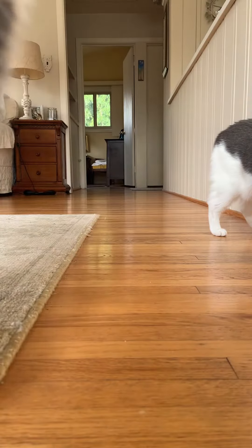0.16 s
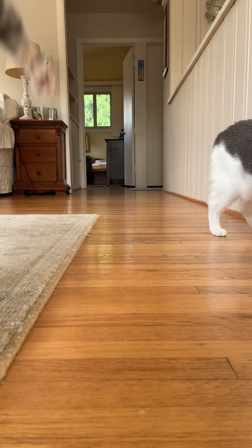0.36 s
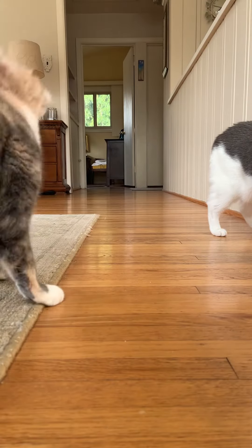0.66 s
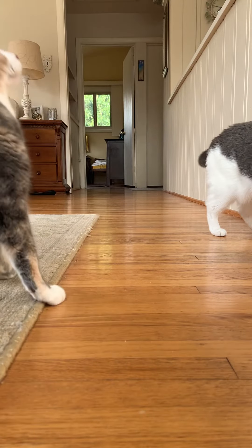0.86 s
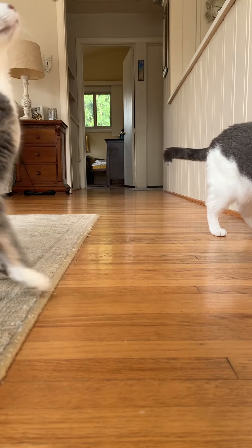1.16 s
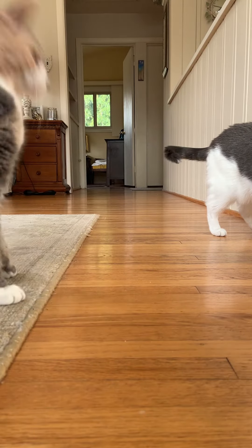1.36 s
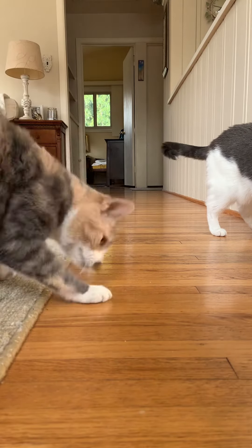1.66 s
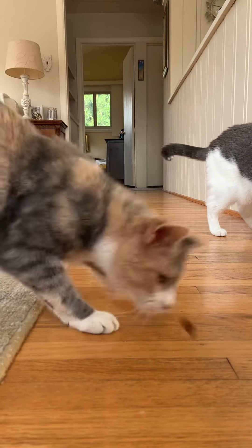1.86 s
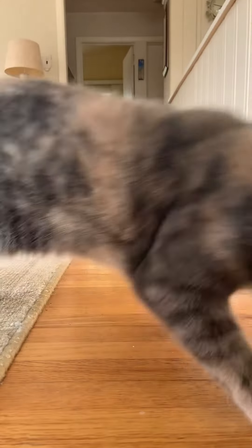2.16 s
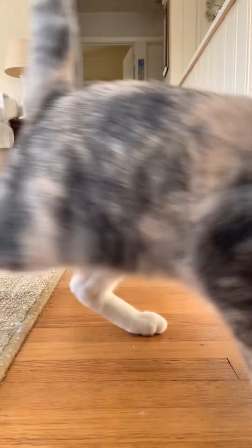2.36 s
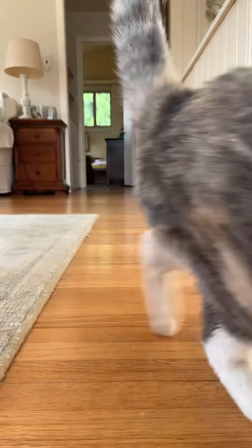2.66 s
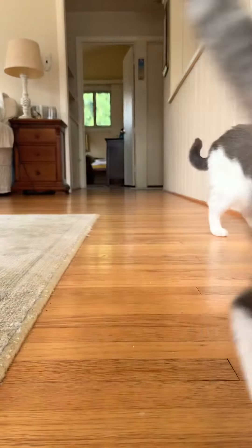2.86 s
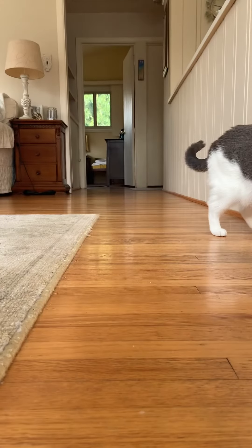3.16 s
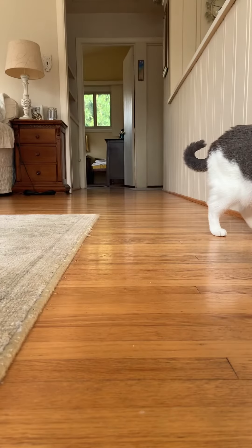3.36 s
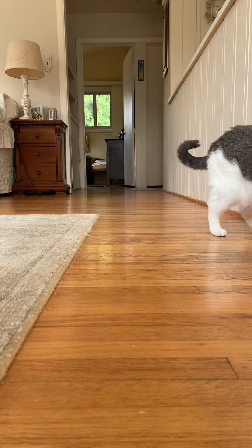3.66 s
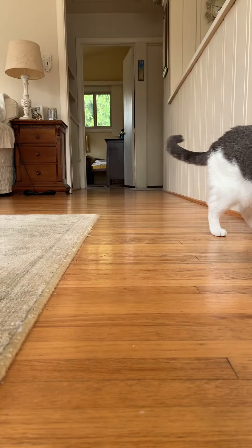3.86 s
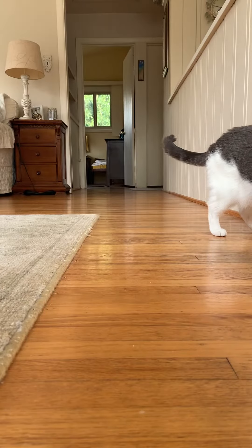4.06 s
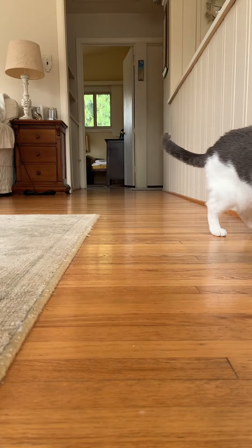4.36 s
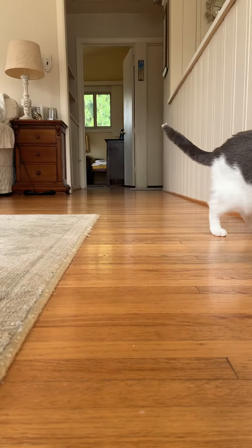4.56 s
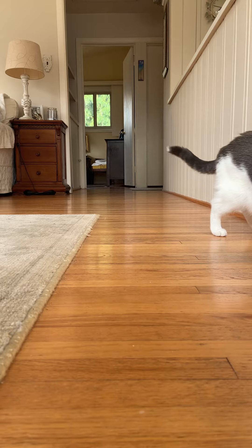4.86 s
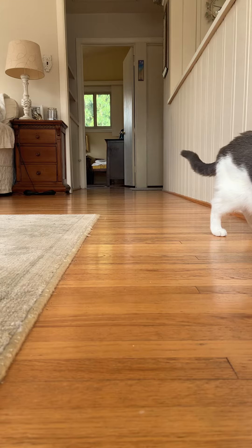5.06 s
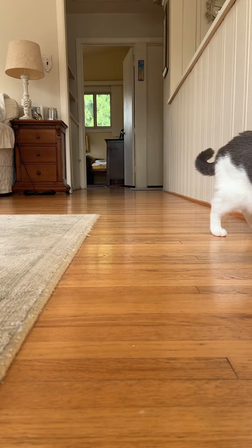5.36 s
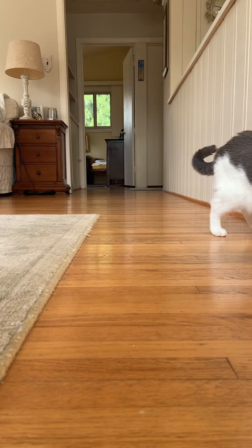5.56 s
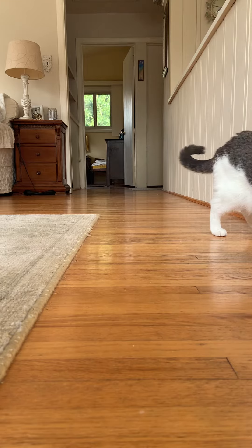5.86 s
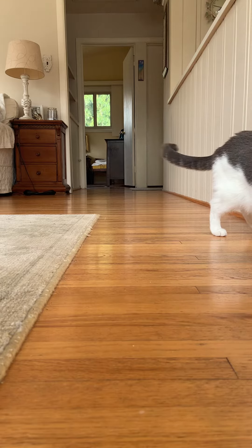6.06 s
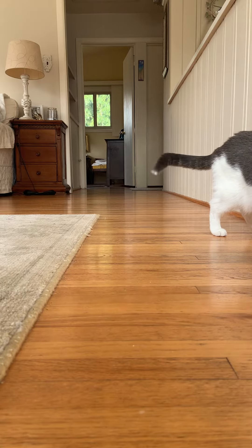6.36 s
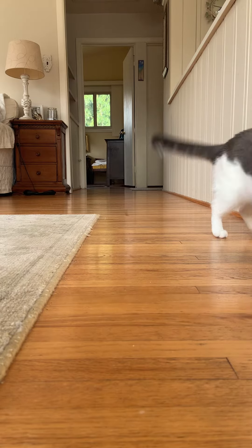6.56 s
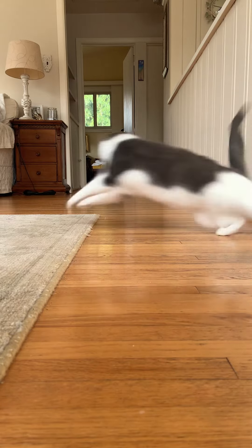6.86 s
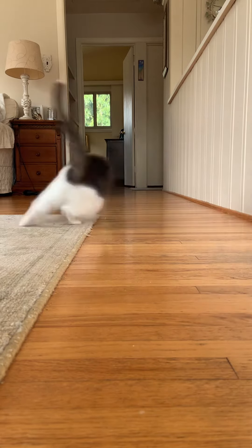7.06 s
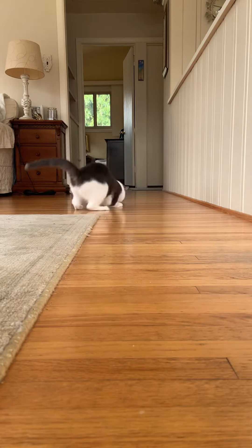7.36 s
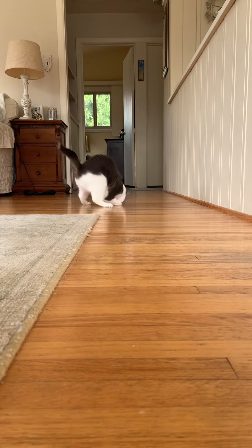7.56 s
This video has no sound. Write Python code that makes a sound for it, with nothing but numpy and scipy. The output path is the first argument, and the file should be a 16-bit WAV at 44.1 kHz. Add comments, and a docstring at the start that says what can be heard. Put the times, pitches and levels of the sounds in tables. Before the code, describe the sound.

Close stereo sound from floor level: near silence with faint hiss and low house rumble, then hard treat clicks on planks and a rapid patter of claws with knocky wood tone. Scraping fades, a sleeve rustles faintly, a loud click rings out with smaller bounces. Last, heavier paw thuds, scratchy claw slides and rumbling boards move down the hallway with short wall echoes.

```python
"""Dry treats tossed on a hardwood floor click in a quiet hallway while two cats chase them.
Each hard contact is two close cracks and a plank knock; each paw thump is a fading low swing of the board.
Scrabbling claws and rustling cloth are shaped noise, and a faint rumble and hiss lie underneath.
Wall echoes and a fading tail make the hallway; a phone lying on the floor hears it in stereo."""
import sys
import numpy as np
from scipy import signal
from scipy.fft import rfft, irfft, next_fast_len
from scipy.io import wavfile
from scipy.ndimage import map_coordinates

SR = 44100
rng = np.random.default_rng(int(sys.argv[2]) if len(sys.argv) > 2 else 0)


def wav_out(sig):
    """Save sig, one row per channel (or a flat mono array), as 16-bit PCM at SR to the path in sys.argv[1]."""
    wavfile.write(sys.argv[1], SR, np.round(np.clip(np.atleast_2d(sig).T, -1, 1) * 32767).astype(np.int16))


N = 340011  # length of the scene in samples


def amp(db):
    """Turn decibels into a plain multiplier."""
    return 10 ** (np.asarray(db) / 20)


def unit(x):
    """Scale a signal to an average strength (rms) of 1."""
    return x / np.sqrt(np.mean(x ** 2) + 1e-20)


def along(points, hz):
    """Read a (frequency, value) table at any frequency, on a logarithmic pitch axis."""
    f, value = np.transpose(points)
    return np.interp(np.log(hz + 1), np.log(f + 1), value)


def level_curve(rows):
    """Give a level in dB for every sample, practically silent outside the span of its table."""
    s, db = np.transpose(rows)
    return np.interp(np.arange(N) / SR, s, db, left=-200, right=-200)


def wobble(rate):
    """Draw a smooth random curve through `rate` random points a second."""
    knots = rng.standard_normal(int(N * rate / SR) + 4)
    return map_coordinates(knots, [np.arange(N) * rate / SR])


def filtered(x, response):
    """Multiply the spectrum of x by a (possibly complex) response of frequency."""
    n = x.shape[-1]
    padded = next_fast_len(n + 8192)
    hz = np.fft.rfftfreq(padded, 1 / SR)
    return irfft(rfft(x, padded) * response(hz), padded)[..., :n]


def resonant(x, modes):
    """Let x ring in several resonances (frequency, width, dB), every second one upside down."""
    def response(f):
        total = 0
        for k, (center, width, db) in enumerate(modes):
            peak = 1j * f * width / (center * center - f * f + 1j * f * width)
            total = total + (-1) ** k * amp(db) * peak
        return total
    return filtered(x, response)


# How alike left and right are in sound from all around: (frequency [Hz], likeness [0 to 1])
LEFT_RIGHT_LIKENESS = [(100, 1), (300, 0.72), (700, 0.15), (2500, 0.059), (4000, 0.76), (7000, 1)]


def spread(pair):
    """Mix two unrelated signals into left and right: a shared part plus a part of opposite sign."""
    def shares(hz):
        turn = np.arccos(np.clip(along(LEFT_RIGHT_LIKENESS, hz), 0, 1)) / 2
        return np.array([np.cos(turn), np.sin(turn)])
    mid, side = filtered(pair, shares)
    return np.array([mid + side, mid - side])


def noise(spectrum, grain_db=0, grain_rate=300):
    """Make wide coloured noise of rms 1, its strength broken into grains."""
    pair = amp(grain_db * wobble(grain_rate)) * rng.standard_normal((2, N))
    colored = filtered(pair, lambda hz: amp(along(spectrum, hz)))
    return unit(spread(colored))


# Hard contacts on the floor: treats, claws and a few dull paw taps: (time [s],
# crack level around 2 kHz [dB], treble tilt before its share [dB],
# knock drive over the crack level [dB], gap to the second crack [ms])
CONTACTS = [(0.3092, -37.5, -71, 26, 1.3), (0.4953, -26.5, -50, 34, 2.05), (0.9223, -36.5, -69, 34.5, 0.84),
            (1.369, 3, 0, 13, 1.09), (1.4426, 0.5, -4.5, 8.5, 0.59), (1.6646, -9.5, -8, 20, 0.61),
            (1.676, -8.5, -1.5, 22, 1.3), (1.7994, -6, -92, 16, 2.4), (1.8371, -4.5, -25.5, 15, 1.12),
            (1.9061, -6, -28, 10, 0.92), (1.9585, -5.5, -9, 4, 2.13), (1.996, -6, -8, 11, 1.47),
            (2.0347, -15, -11, -19, 2.7), (2.0536, -13.5, -11, 11.5, .69), (2.0776, -20, -7, -19, 0.63),
            (2.0972, -14, -22, -22, 1.1), (2.2202, -19.5, -22, 1, 1.76), (2.2405, -25.5, -25, -10.5, 1.1),
            (2.258, -28.5, -14, -11, 0.94), (2.4227, -22, -31, 11, 0.95), (2.9478, -31.5, -26, 11, 1.6),
            (3.0065, -14.5, -47, -32, 0.52), (3.151, -20, -17, -19, 0.61), (3.2114, -32.5, -10, 2.5, 2.2),
            (3.9915, -48, 3, 7.5, .68), (4.201, 5, -0.5, -3.5, 1.59), (4.4294, -2.5, -17, 1.5, 0.86),
            (4.5305, -14.5, -19, 4, 1.52), (4.5734, -16.5, -60, -10, 1.66), (4.619, -12, -25, -3, 0.51),
            (4.64, -11.5, -22, -12, 1.73), (4.6683, -9, -42, 4, 0.87), (4.823, -15, -33, 3.5, 1.01),
            (4.8549, -16, -11.5, 1.5, 0.8), (5.1007, -14, -71, -0.5, 1.14),
            (5.4037, -20.5, -45.5, -22, .51), (5.6271, -27.5, -55.5, -6, 2.06), (6.4301, -6, 4, 24.5, 2.25),
            (6.708, -15, 5, 17.5, 0.91), (6.8154, -19, -15, 21.5, 1.2), (6.904, -18.5, 3.5, 25, .99),
            (6.993, -9, -66, 14.5, 2.06), (7.056, -22, 8, 15, 0.78), (7.07, -23.5, -6, 0, .58),
            (7.147, -13, -2.5, 16, 1.1), (7.265, -19, 10, 27, 0.5), (7.278, -5, -12, 11.5, 1.33),
            (7.313, -4.5, -6.5, 6, 1), (7.396, -5.5, -6.5, 11.5, 1.3), (7.4274, -11, -42, 4, 0.66),
            (7.523, -13.5, -23, -14, 0.43), (7.5422, -18.5, -10.5, 17, 1.45), (7.5915, -20, -7, 24, 0.8)]
# Colour of a hard contact: (frequency [Hz], level [dB])
CRACK_COLOR = [(100, -32.5), (400, -9), (1100, -2), (2000, 0.5), (2800, -2.5), (3600, 3.5), (4700, -0.5),
               (6200, 3), (10000, 1), (16000, -11.5)]
# How much of the treble tilt acts: (frequency [Hz], share)
TREBLE_SHARE_BY_HZ = [(1100, -0.075), (2000, -0.024), (3400, 0.21), (5600, 0.27), (10000, 1.275),
                      (16000, 1.7)]
# Resonances of the plank: (frequency [Hz], width [Hz], level [dB])
PLANK_MODES = [(397, 70, -3), (843, 120, -0.5), (1270, 56, -1.5)]
# Dry near the phone, roomy further off: (time [s], room feed over direct feed [dB])
ROOM_FEED = [(0, -13.5), (1.37, -13.5), (2.0, -16.5), (2.45, -3), (3.0, -19.5), (4.2, -11), (4.85, -8),
             (5.6, -15.5), (6.43, -5.5), (6.9, 1), (7.4, -8), (7.7, 0)]


def clicks():
    """Each hard contact is two close cracks and a plank knock; returns direct sound and room feed."""
    lead = 100  # samples before the contact
    t = np.arange(-lead, 500) / SR
    blow = np.pad([1.], (lead + 40, 4000))
    # narrow the push around 417 Hz, so the knock has little deep sound
    pushed = resonant(blow, [(417, 120, 0.0033)])
    knock = resonant(pushed, PLANK_MODES)
    dry, wet = np.zeros((2, N + SR))
    for s, db, treble_db, knock_db, gap_ms in CONTACTS:
        room_db = np.interp(s, *np.transpose(ROOM_FEED))
        hits = np.zeros(len(t))
        hits[[lead, lead + round(gap_ms * SR / 1000)]] = 1, .7
        # a quickly dying burst of noise after each hit
        splinters = 0.18 * amp(-60 * np.abs(t) / 0.0055) * (t > 0) * rng.standard_normal(len(t))
        crack = signal.fftconvolve(hits, splinters + (t == 0))[lead:][:len(t)]
        crack = crack / np.linalg.norm(crack)
        room_crack = hits + 0.41 * (t == 0)
        crack, room_crack = filtered(
            np.array([crack, room_crack]),
            lambda hz: amp(db + along(CRACK_COLOR, hz) + treble_db * along(TREBLE_SHARE_BY_HZ, hz)))
        at = round(s * SR) - lead
        dry[at:][:len(t)] += crack
        dry[at:][:len(knock)] += amp(db + knock_db) * knock
        wet[at:][:len(t)] += amp(room_db) * room_crack
        wet[at:][:len(knock)] += amp(db + knock_db + room_db) * knock
    return dry[:N], wet[:N]


# Paw falls: (time [s], strength [dB], pitch [Hz])
PAW_FALLS = [(0.312, -38.5, 143), (0.342, -41.5, 120), (0.513, -26, 55.6), (1.671, -31, 329),
             (1.701, -34, 67.5), (2.206, -33, 70), (2.473, -41, 92.4), (2.757, -37.5, 254),
             (6.653, -30, 233), (6.683, -20.5, 221), (6.714, -22.5, 192), (6.762, -31, 254),
             (6.809, -34, 230), (6.961, -9.5, 124), (6.996, -18, 194.5), (7.023, -19, 125),
             (7.059, -36, 200), (7.156, -31.5, 114), (7.24, -19, 227), (7.278, -24.5, 121.5),
             (7.449, -33, 142.4), (7.583, -32, 133.6)]


def paws():
    """A soft pad pushes the board down; it swings a few times and dies away."""
    out = np.zeros(N + SR)
    t = np.arange(SR // 3) / SR
    for s, db, hz in PAW_FALLS:
        swing = np.sin(2 * np.pi * hz * t)
        swing += 0.51 * np.sin(2 * np.pi * 1.9 * hz * t) * amp(-60 * t / 0.07)
        swing += .5 * np.sin(2 * np.pi * 300 * t) * amp(-60 * t / .06)  # a fixed mode of the board
        soft_start = (1 - np.exp(-t / 0.0019)) ** 2
        fade = amp(db - 60 * t / 0.048)  # the whole swing loses 60 dB in 0.048 s
        out[round(s * SR):][:len(t)] -= fade * soft_start * swing
    return out[:N]


# Claws, pads and fur sliding on the wood: (time [s], length before the fast fade [s],
# level before the slide's shape is counted [dB], varnish ring over the body [dB])
SLIDES = [(0.501, 0.056, -67.5, -35), (.93, .06, -74.5, -40), (2.105, 0.16, -62.5, -38),
          (2.226, 0.014, -64, 5), (2.254, 0.17, -64.5, -24), (2.373, 0.28, -56, -34),
          (2.514, 0.039, -41.5, -6.5), (2.547, 0.039, -49.5, -41), (2.628, 0.1, -57, -45),
          (2.722, 0.051, -51, -52), (2.772, 0.049, -51, -47), (2.839, 0.074, -53.5, -54),
          (2.902, 0.081, -60.5, -39), (2.997, .016, -48, -39), (3.035, 0.2, -68, -11),
          (4.444, 0.064, -57, -24), (4.532, 0.042, -74, -34), (4.691, 0.15, -75, -40),
          (4.859, 0.064, -52.5, -18), (5.02, 0.076, -54, -38.5), (5.228, 0.068, -64.5, -40.5),
          (5.333, 0.094, -64.5, -26), (5.452, .16, -66, -36), (5.753, 0.046, -79.5, -29.5),
          (6.731, .07, -51.5, -5), (6.8, 0.028, -45.5, 0), (6.918, 0.14, -49.5, -6.5),
          (7.076, 0.11, -59.5, 2), (7.165, 0.15, -50, 4.5), (7.239, 0.11, -40, -5), (7.398, 0.076, -55, 2),
          (7.499, 0.1, -47.5, -7.5)]
SLIDE_HZ = 1688  # middle of the slides' resonances
SLIDE_SCATTER, CHANCE_SCATTER = .1, .45  # log spread from slide to slide, and of the chance resonances
TICKS_PER_S, TICK_DB, TICK_SCATTER_DB = 300, 20, 4  # single catches: average rate, drive and its spread
SWELL_SHARE = 0.15  # time constant of pressing down, as a share of the length


def strokes():
    """Gritty slips and single catches ring in the slide's own, chance, board and varnish resonances."""
    out = np.zeros((2, N + SR))
    grit = np.pad(amp(4.5 * wobble(160) + 4 * wobble(45)), (0, SR))
    for s, length, db, varnish_db in SLIDES:
        hz = SLIDE_HZ * np.exp(SLIDE_SCATTER * rng.standard_normal())
        t = np.arange(round((length + 0.061) * SR)) / SR
        at = slice(round(s * SR), round(s * SR) + len(t))
        swell = 1 - np.exp(-t / (SWELL_SHARE * length))
        fade = amp(-4 * t / length - 60 * np.maximum(t - length, 0) / 0.021)
        shape = swell * fade
        caught = rng.random(len(t)) < TICKS_PER_S / SR
        ticks = caught * amp(TICK_DB + TICK_SCATTER_DB * rng.standard_normal(len(t)))
        hiss = grit[at] * rng.standard_normal((2, len(t)))
        slips = (hiss + ticks * [[1], [0]]) * shape  # catches go only to the shared part of left and right
        chance = [(hz * np.exp(CHANCE_SCATTER * step), 350, -3) for step in rng.standard_normal(3)]
        body = resonant(resonant(slips, [(hz, 2800, 0)]), [(hz, 900, 0), *chance])
        body = body + resonant(slips, [(747, 110, -14.5), (1130, 300, -9)])  # the board under the paw
        varnish = resonant(resonant(slips, [(4990, 2500, 0)]), [(5200, 1600, 0)])
        strength = amp(db) * np.sqrt(np.mean(shape ** 2))
        out[:, at] += strength * (unit(body) + amp(varnish_db) * unit(varnish))
    return spread(out[:, :N])


# Cloth moving, one list for each stretch: (time [s], level [dB])
CLOTH_MOVES = [
    [(3.36, -80.5), (3.48, -69), (3.62, -62), (3.86, -66.5), (3.97, -90)],
    [(4.05, -81.5), (4.125, -64.5), (4.2, -69)],
    [(5.9, -90), (6.042, -81), (6.15, -74.5), (6.33, -79), (6.41, -83)],
]
# Colour of the cloth noise: (frequency [Hz], relative level [dB])
CLOTH_COLOR = [(300, -2), (700, -4), (1600, -1), (3000, -8), (6000, -18), (16000, -23)]


def cloth():
    """A sleeve brushes before a throw: grainy noise that swells and fades."""
    strength = sum(amp(level_curve(rows)) for rows in CLOTH_MOVES)
    return strength * noise(CLOTH_COLOR, 1.0, 42)


# Wall echoes: (delay [s], level [dB])
WALL_ECHOES = [(0.0168, -17), (.029, -9), (.035, -7.5), (0.051, -14.5)]
# How fast the main tail dies: (frequency [Hz], time to lose 60 dB [s])
HALL_FADE = [(150, 0.38), (400, 0.33), (1040, 0.49), (2760, 0.42), (7280, 0.23), (14000, 0.22)]
# The treble of the tail fills in later than the bass: (frequency [Hz], rise time constant [s])
TAIL_RISE = [(1500, 0.0025), (5000, 0.017)]
LATE_DB, LATE_T60_S = -21.5, 0.75  # the further rooms ring on: level beside the main tail, time to lose 60 dB


def hall(x):
    """Rough wall echoes and a dying tail; sources move, so each eighth of a second gets its own."""
    out = np.zeros((2, N + 2 * SR))
    step = SR // 8
    for start in range(0, N, step):
        hz, t, grains = signal.stft(rng.standard_normal((2, SR // 2)), SR, nperseg=256)
        rise = 1 - np.exp(-(t / along(TAIL_RISE, hz)[:, None]) ** 2)
        fade = amp(-60 * t / along(HALL_FADE, hz)[:, None])
        late = amp(LATE_DB - 60 * t / LATE_T60_S)
        tail = signal.istft(grains * rise * (fade + late), SR, nperseg=256)[1]
        tail = spread(tail) / np.linalg.norm(tail[0])
        for s, db in WALL_ECHOES:
            rough = np.diff(rng.standard_normal(41) * np.hanning(41))  # panelling scatters the treble
            tail[:, round(s * SR):][:, :len(rough)] += amp(db) * rough / np.linalg.norm(rough)
        answer = signal.fftconvolve(x[None, start:start + step], tail, axes=1)
        out[:, start:start + answer.shape[1]] += answer
    return out[:, :N]


# House rumble and shaking boards: (time [s], level before a random sway [dB])
RUMBLE_LEVEL = [(0.0, -64.5), (0.43, -66), (1.09, -67), (2.4, -60), (3.18, -67.5), (4.53, -63),
                (6.05, -69.5), (6.66, -61.5), (6.83, -51.5), (7.09, -41), (7.71, -53.5)]
# Colour of the rumble: (frequency [Hz], relative level [dB])
RUMBLE_COLOR = [(20, -42.5), (40, -2.5), (60, 1.5), (80, -4), (125, -2.5), (200, -9.5), (300, -15.5),
                (500, -28), (900, -60)]
# Colour of the hiss: (frequency [Hz], relative level [dB])
HISS_COLOR = [(200, -8), (600, -1), (1500, 2), (3000, -2), (5000, -4), (9000, -6), (15000, -6.5),
              (15600, -31)]


def background():
    """Low, swaying noise for the rumble of the house, with a faint steady hiss."""
    sway_db = 1.5 * wobble(9)
    rumble = amp(level_curve(RUMBLE_LEVEL) + sway_db) * noise(RUMBLE_COLOR)
    return rumble + amp(-78.0) * noise(HISS_COLOR)


def scene():
    """Add the direct sounds, their answer from the hallway, the cloth and the background."""
    dry, wet = clicks()
    thumps = paws()
    slides = strokes()
    room = hall(wet + amp(-3.5) * thumps + amp(-12.5) * slides[0])
    return dry + thumps + slides + room + cloth() + background()


# Phase by which left leads right: (frequency [Hz], lead [radians])
LEFT_LEAD = [(0, 0), (300, -.3), (550, -.8), (1100, -1.5), (1800, -.3), (3600, 1.3), (4600, 3.14),
             (16000, 19.4)]
# Bass balance: (frequency [Hz], left minus right [dB])
BASS_LEAN = [(30, 3), (150, 1.5), (300, 2), (600, 0)]
# Response shared by both microphones: (frequency [Hz], level [dB])
MIC_RESPONSE = [(20, -26), (45, 2), (12000, -3), (15500, -5), (16600, -13.5)]
TOP_HZ = 16650  # nothing is kept from here up


def record(dry):
    """The two microphones differ in phase and bass level and share one limited frequency range."""
    def response(hz):
        phase = np.exp(.5j * np.interp(hz, *np.transpose(LEFT_LEAD)))
        half = phase * amp(along(BASS_LEAN, hz) / 2)  # each side takes half the difference
        return np.array([half, 1 / half]) * amp(along(MIC_RESPONSE, hz)) * (hz < TOP_HZ)
    return filtered(dry, response)


dry = scene()
out = record(dry)
wav_out(out)
```